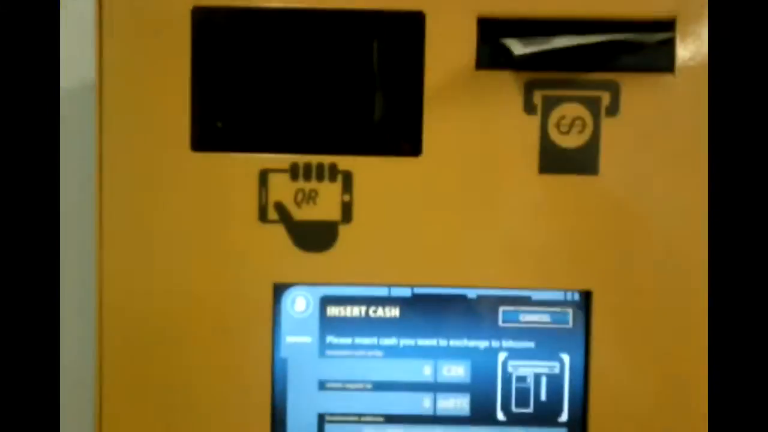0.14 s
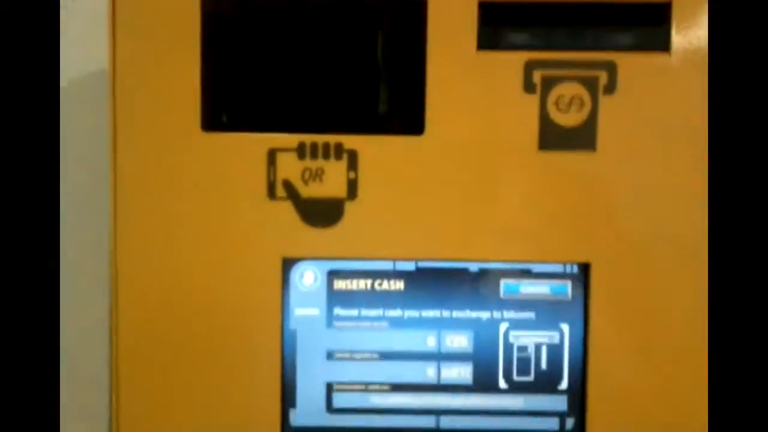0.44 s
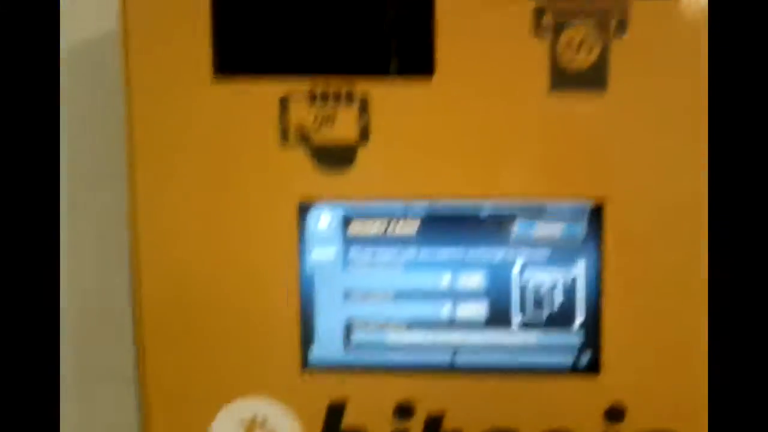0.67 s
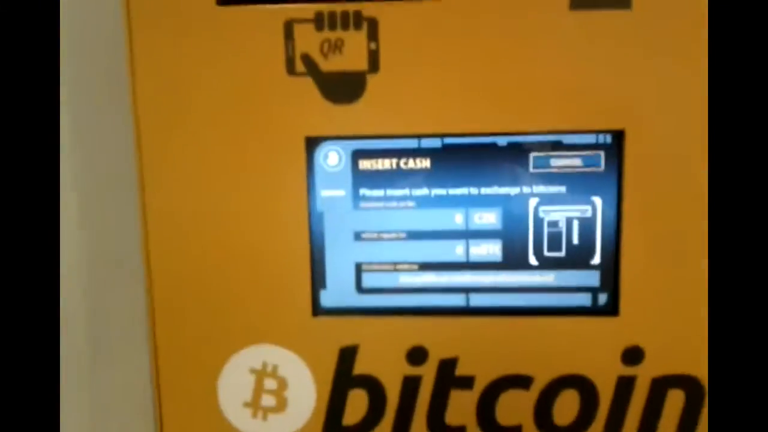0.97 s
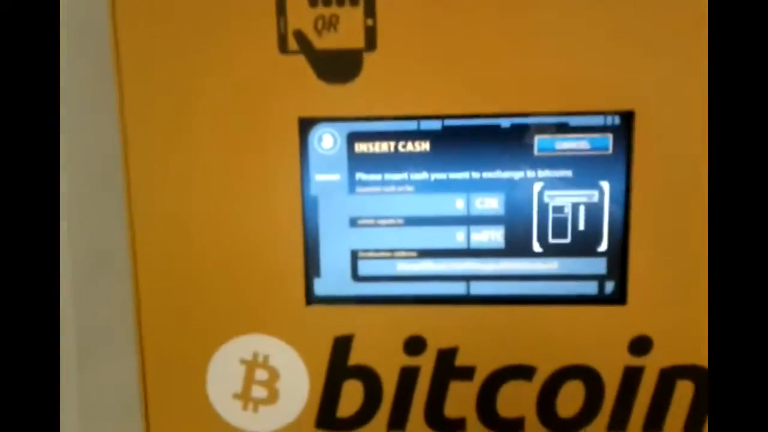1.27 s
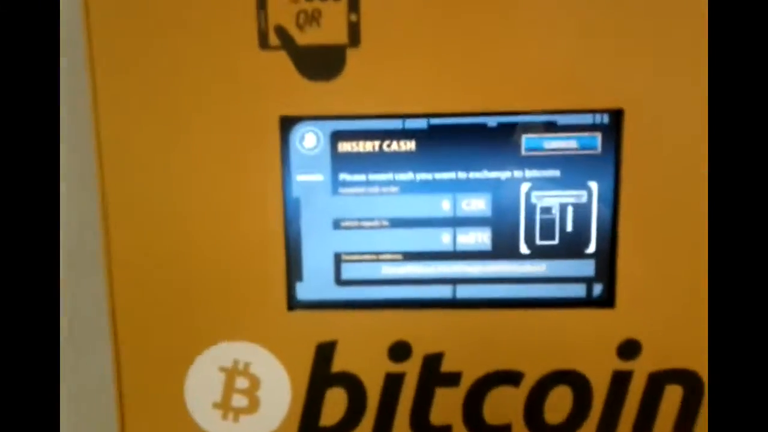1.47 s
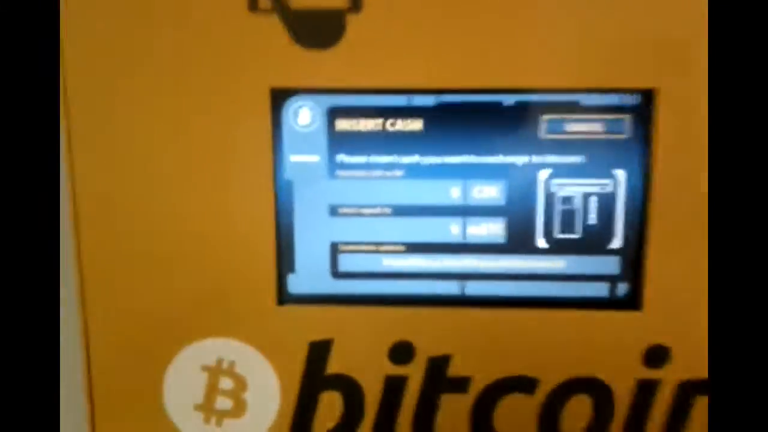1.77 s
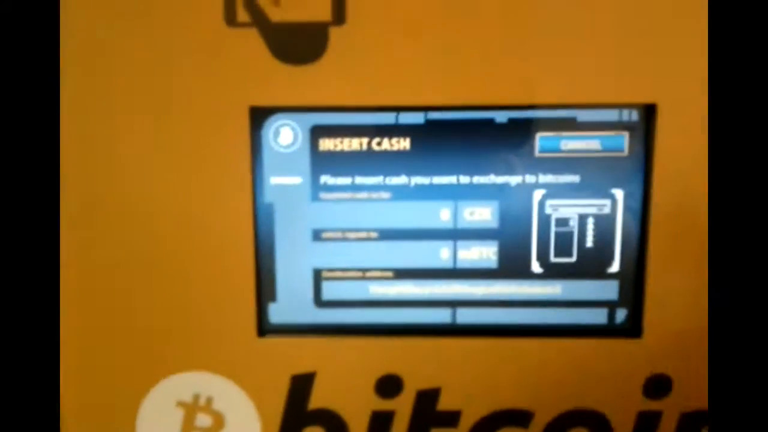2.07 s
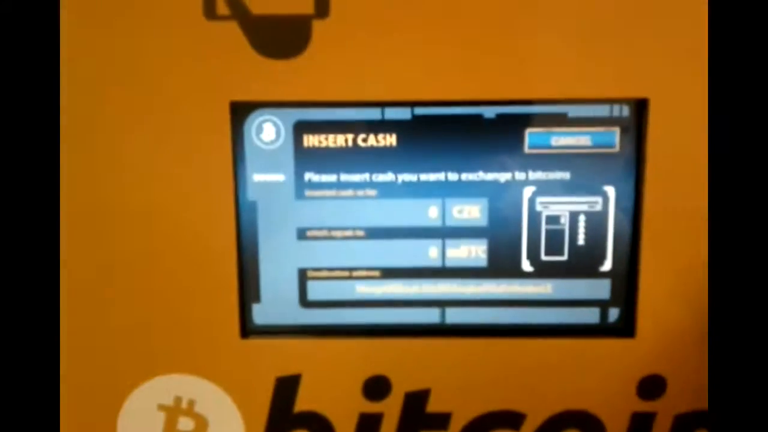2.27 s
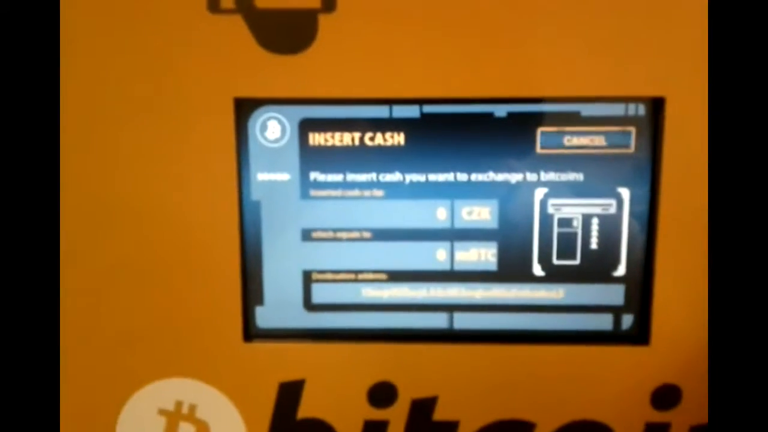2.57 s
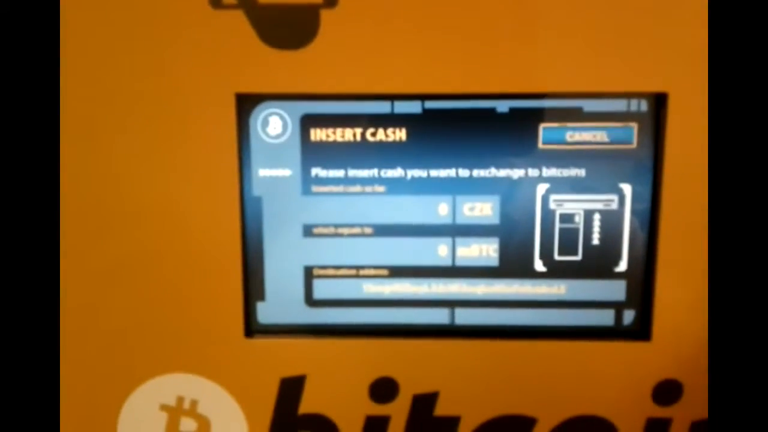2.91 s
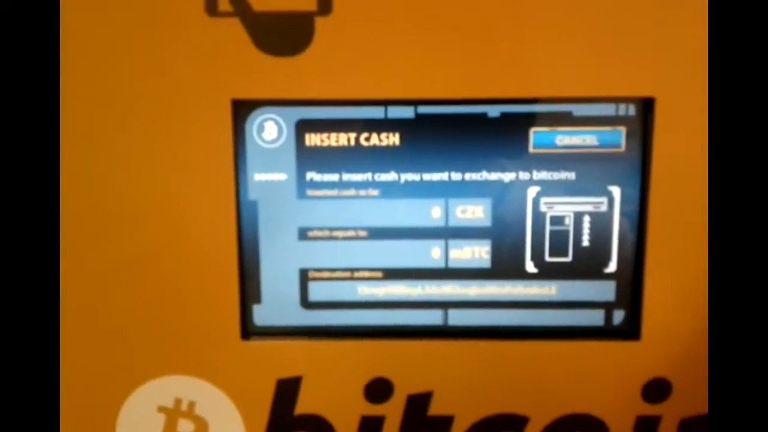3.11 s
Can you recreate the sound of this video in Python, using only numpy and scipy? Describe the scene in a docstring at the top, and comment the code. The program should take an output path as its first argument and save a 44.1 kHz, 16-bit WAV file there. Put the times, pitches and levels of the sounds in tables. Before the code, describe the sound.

Short motor whirs from a cash machine pulling in a banknote, with snaps and paper rustle.

```python
"""A snap and the crackle of a banknote entering its slot open the scene, indoors and close to a phone.
A geared motor then drives the rollers in two short runs: tooth tones at multiples of the shaft rate over noise.
A second small motor hums as a tone with its fifth harmonic; parts click as noise bursts exciting modes.
The note scrapes as grainy coloured noise. Short sine pips, a decaying echo and a quiet room rumble complete it."""
import sys
import numpy as np
from scipy import signal
from scipy.fft import rfft, irfft, next_fast_len
from scipy.io import wavfile
from scipy.ndimage import uniform_filter1d, map_coordinates

SR = 44100
rng = np.random.default_rng(int(sys.argv[2]) if len(sys.argv) > 2 else 0)


def unload_audio(sound):
    """Save the sound as a 16-bit wav file, at the path given as the first command line argument."""
    columns = np.transpose(np.atleast_2d(sound))
    # keep every value between -1 and 1, then stretch to whole-number steps
    steps = np.round(np.clip(columns, -1, 1) * 32767)
    wavfile.write(sys.argv[1], SR, steps.astype(np.int16))


def volts_from_decibels(level):
    """Turn decibel levels (scalar or array-like) into linear amplitude factors."""
    exponent = np.asarray(level, float) / 20
    return 10 ** exponent


N = 143325  # samples


def unit(x):
    """Normalisation: scale a signal to rms 1."""
    return x / np.sqrt(np.mean(x ** 2) + 1e-20)


def along(points, hz):
    """Logarithmic frequency scale: interpolate (f/Hz, value) points on it."""
    f, v = np.transpose(points)
    return np.interp(np.log(hz + 1), np.log(f + 1), v)


def curves(rows, rise_s, fall_db_per_s):
    """Envelope: a gate fading in before the first row and decaying after the last, then each column over time."""
    s, *columns = np.transpose(rows)
    t = np.arange(N) / SR
    fade_in = np.clip((t - s[0]) / rise_s + 1, 0, 1) ** 2
    run_down = volts_from_decibels(-fall_db_per_s * np.clip(t - s[-1], 0, 1))
    return [fade_in * run_down] + [np.interp(t, s, column) for column in columns]


def wobble(rate):
    """Random modulation: straight lines between normal random knots, rate knots a second."""
    knots = rng.standard_normal(int(N * rate / SR) + 4)
    return map_coordinates(knots, [np.arange(N) * rate / SR], order=1)


def filtered(x, response):
    """Linear filtering: multiply the spectrum of x by a function of frequency."""
    m = next_fast_len(x.shape[-1] + 8192)
    spectrum = rfft(x, m) * response(np.fft.rfftfreq(m, 1 / SR))
    return irfft(spectrum, m)[..., :x.shape[-1]]


def resonance(hz, centre_hz, width_hz):
    """Second-order resonance: complex band-pass response, 1 at its centre."""
    damping = 1j * hz * width_hz
    return damping / (centre_hz ** 2 - hz ** 2 + damping)


def rush(spectrum, patchy_db, grains=0):
    """Coloured noise: filtered white noise of rms 1, with time-frequency patches of random gain."""
    z = signal.stft(rng.standard_normal(N) + grains, nperseg=256)[2]
    patches = uniform_filter1d(rng.standard_normal(z.shape), size=4, axis=0)
    patches = unit(uniform_filter1d(patches, size=8, axis=1))
    x = signal.istft(z * volts_from_decibels(patchy_db * patches), nperseg=256)[1][:N]
    return unit(filtered(x, lambda hz: volts_from_decibels(along(spectrum, hz))))


# spectral density of the room rumble: f/Hz, relative level/dB
RUMBLE_SPECTRUM = [(20, -21), (70, -18.5), (130, -5), (300, -2.5), (500, -6.5), (1050, -11.5),
                   (3500, -20.5), (6800, -23)]


def room_rumble():
    """Stationary background noise: coloured noise with a slowly wavering level."""
    level_db = -48.5 + 1.1 * wobble(5.1)
    return volts_from_decibels(level_db) * rush(RUMBLE_SPECTRUM, patchy_db=1.66)


# decay time of the room: f/Hz, t60/s
ROOM_DECAY = [(500, 0.43), (6000, 0.12)]


def room_echo(x):
    """Reverberation: convolution with noise whose decay rate depends on frequency."""
    hz, t, z = signal.stft(rng.standard_normal(SR // 2), SR, nperseg=256)
    t60 = along(ROOM_DECAY, hz)[:, None]
    tail = signal.istft(z * volts_from_decibels(-60 * t / t60), SR, nperseg=256)[1]
    delayed = np.pad(x, (200, 0))  # samples
    return signal.fftconvolve(delayed, tail / np.linalg.norm(tail))[:N]


# a soft low knock, a squeak at each motor start, a dry tick between the runs: t/s, peak level/dB, f/Hz, length/s
PIPS = [(0.361, -36, 399, 0.023), (0.448, -29, 4350, 0.026), (1.8286, -21.5, 2300, 0.0021),
        (2.723, -30.5, 4300, 0.025)]


def pips():
    """Tone bursts: sines under a cosine-squared window centred on their time."""
    t = np.arange(N) / SR
    out = np.zeros(N)
    for s, db, hz, length in PIPS:
        swell = np.cos(np.pi * np.clip((t - s) / length, -.5, .5)) ** 2
        out += volts_from_decibels(db) * swell * np.sin(2 * np.pi * hz * t + 7 * rng.random())
    return out


# second motor, one table a run: t/s, f/Hz, level/dB before a common gain and waver
HUM_RUNS = [
    [(.475, 164.5, -48.5), (.53, 184.9, -43), (1.07, 186, -44.5), (1.145, 189, -55)],
    [(2.745, 158, -46), (2.78, 170, -43.5), (2.825, 181, -45.5), (3.115, 183, -43.5), (3.165, 180.2, -56),
     (3.19, 179.5, -49), (3.25, 177, -53.5)],
]


def second_motor_hum():
    """Frequency modulation: an unsteady low tone with a phase-locked fifth harmonic."""
    out = np.zeros(N)
    for rows in HUM_RUNS:
        gate, hz, db = curves(rows, rise_s=0.0059, fall_db_per_s=900)
        phase = 2 * np.pi * np.cumsum(hz) / SR + 0.26 * wobble(35)
        level = volts_from_decibels(db + 2.0 + 1.9 * wobble(25))
        fifth = volts_from_decibels(-6.5 + 8.3 * wobble(16)) * np.sin(5 * phase)
        out += gate * level * (np.sin(phase) + fifth)
    return out


# snaps and clicks: t/s, peak level of the burst/dB, main pitch f/Hz, low knock relative level/dB, t60/s
SNAPS = [(.003, -10.5, 5000, -24.5, 0.0165), (.0827, -4, 5600, -20, 0.02), (.089, -12, 3330, -16.5, 0.031),
         (0.0943, -16.5, 5760, -17, 0.008), (0.1008, -17.5, 5360, -17, 0.027),
         (1.0385, -7, 5030, -20, 0.018), (1.087, -15.5, 4930, -30, 0.026),
         (1.0964, -13, 4580, -28.5, 0.029), (1.263, -7.5, 5000, -29, 0.021), (1.83, -29, 3700, -15, 0.0077),
         (3.193, -17.5, 2350, -22, 0.021)]
# modes of the mechanism: f/Hz
SNAP_MODES_HZ = [1200, 1750, 2300, 2860, 3330, 4380, 5107, 5500, 5900, 6500]


def snaps():
    """Modal excitation: a noise burst through modes loudest near its pitch, over a low knock of the housing."""
    pitch_width_hz, broad_db, mode_width_hz = 900, -16, 280
    rise_s, knock_hz, knock_width_hz, knock_t60 = .0018, 720, 200, 0.08
    out, t = np.zeros(N + SR), np.arange(SR // 8) / SR
    rise = 1 - np.exp(-t / rise_s)
    for s, db, pitch_hz, knock_db, t60 in SNAPS:
        burst_noise, knock_noise = rng.standard_normal((2, len(t)))
        gains = []
        for mode_hz in SNAP_MODES_HZ:
            nearness = abs(resonance(mode_hz, pitch_hz, pitch_width_hz)) + volts_from_decibels(broad_db)
            gains.append(nearness * volts_from_decibels(2 * rng.standard_normal()))

        def modes(hz):
            """Modal superposition: resonances of alternating sign."""
            return sum((-1) ** k * gain * resonance(hz, mode_hz, mode_width_hz)
                       for k, (mode_hz, gain) in enumerate(zip(SNAP_MODES_HZ, gains)))

        burst = filtered(burst_noise * rise * volts_from_decibels(-60 * t / t60), modes)
        knock = unit(filtered(knock_noise, lambda hz: resonance(hz, knock_hz, knock_width_hz)))
        knock *= volts_from_decibels(knock_db - 60 * t / knock_t60)
        start = max(round((s - rise_s / 2) * SR), 0)
        out[start:][:len(t)] += volts_from_decibels(db) * (burst / np.abs(burst).max() + rise * knock)
    return out[:N]


# the note scraping in the slot, one table a passage: t/s, level/dB, low part relative level/dB
SCRAPES = [
    [(0, -10, -30), (.02, -37, -3), (.077, -33, -18), (.1, -33.5, -5), (.125, -24.5, -24),
     (.204, -26, -8.5), (.226, -39, -2), (.42, -40, 0)],
    [(1.058, -25.5, -19), (1.078, -36, -9), (1.089, -21, -28), (1.14, -27.5, -7.5), (1.215, -26, -14.5),
     (1.232, -15, -16.5), (1.255, -25.5, -14), (1.29, -37.5, -11), (1.4, -56, -18)],
    [(1.58, -64, 8), (1.66, -46, -10), (1.77, -53.5, -1), (1.826, -45.5, -15)],
    [(3.17, -47.5, 15), (3.25, -39, -14)],
]
# spectral density of the paper friction: f/Hz, relative level/dB
PAPER_SPECTRUM = [(700, -36.5), (1200, -6), (1700, -10.5), (2200, -7.5), (3000, -11), (4300, -5.5),
                  (5400, -5.5), (6800, -8.5)]
# spectral density of the sound stirred in the housing: f/Hz, relative level/dB
HOUSING_SPECTRUM = [(90, -44.5), (200, -16), (510, -5.5), (1180, -5), (1800, -6.5), (2600, -19)]


def note_scrape():
    """Friction noise: random impulses within coloured noise, and the lower sound they stir in the housing."""
    grains_per_s, spread_db, grain_db = 900, 3, -7
    hits = rng.random(N) < grains_per_s / SR
    grains = hits * rng.standard_normal(N) * volts_from_decibels(spread_db * rng.exponential(1, N))
    paper = rush(PAPER_SPECTRUM, patchy_db=1.5, grains=volts_from_decibels(grain_db) * unit(grains))
    housing = rush(HOUSING_SPECTRUM, patchy_db=3.5)
    out = np.zeros(N)
    for rows in SCRAPES:
        gate, db, low_db = curves(rows, rise_s=0.0045, fall_db_per_s=800)
        out += gate * volts_from_decibels(db) * (paper + volts_from_decibels(low_db) * housing)
    return out


# geared motor, one table a run: t/s, shaft f/Hz, gear noise level/dB,
# then group level/dB of the first, second, and third and higher tooth harmonics
GEAR_RUNS = [
    [(.428, 84, -33, -43, -36, -48), (.46, 97.95, -27.5, -33, -31.5, -43),
     (.483, 104.4, -30.5, -25.5, -32, -37), (.512, 108.2, -26, -31.5, -32, -33),
     (.66, 109.45, -24.5, -27.5, -30, -31), (.87, 108.55, -24, -30.5, -28.5, -31.5),
     (.98, 109.55, -24, -29, -31.5, -30.5), (1.04, 109.5, -23, -30, -26, -34)],
    [(2.71, 89.5, -28, -52, -38.5, -44), (2.742, 98.6, -26, -46, -34, -30),
     (2.776, 105.7, -27, -41, -30, -30.5), (2.924, 106.6, -24.5, -35, -31, -30),
     (2.955, 107.3, -24.5, -38, -29.5, -31), (3.048, 106.2, -26.5, -32, -31.5, -31),
     (3.11, 109.8, -23, -26.5, -26, -29), (3.158, 110.4, -22.5, -30, -30.5, -36)],
]
# 12-tooth pinion: multiples of the shaft rate around each tooth harmonic; the fractions come from a middle gear
SHAFT_MULTIPLES = [
    [5.48, 7.2, 11, 12, 13],
    [21, 23, 24, 25],
    [33, 35, 36, 37, 40, 47],
]
# relative level/dB of each multiple, by run and tooth harmonic group
MULTIPLE_DB = [
    [[-19, -14, -8.5, 0, -8], [-13, -2.5, -5, -1], [-2, -1, 0.5, 0, 0, 1]],
    [[-14.5, -15.5, -9.5, -3, -10], [-21, -7, -1.5, -2], [-5, -5, -1.5, -2, -7, -6]],
]
# phase step/rad per multiple, by group: near 0 the tone throbs once a turn, near pi / 2 it warbles
SIDE_PHASE_STEP = [.4, 1.5, 1.5]
# how the housing radiates a tone: f/Hz, gain level/dB
HOUSING_GAIN = [(1140, -12), (1200, 0), (2230, 0), (2350, 9), (2480, -2), (3720, -9), (3820, 0), (4030, -1),
                (4085, -10)]
# spectral density of the gear noise: f/Hz, relative level/dB
GEAR_SPECTRUM = [(80, -35), (200, -16.5), (700, -13.5), (1050, -13), (1300, -3), (1520, -15), (1800, -6.5),
                 (2030, -11), (2400, -6), (3150, -12), (3900, -7), (5200, -7), (6800, -11.5)]


def geared_motor():
    """Gear meshing: tooth harmonics with sidebands at multiples of the shaft rate, over gear noise."""
    waver_db, jitter_rad = 1.3, .15
    out = np.zeros(N)
    for rows, run_levels in zip(GEAR_RUNS, MULTIPLE_DB):
        gate, shaft_hz, noise_db, *group_dbs = curves(rows, rise_s=0.02, fall_db_per_s=894)
        turn = 2 * np.pi * np.cumsum(shaft_hz) / SR
        run = volts_from_decibels(noise_db) * rush(GEAR_SPECTRUM, patchy_db=.8)
        groups = zip(SHAFT_MULTIPLES, run_levels, group_dbs, SIDE_PHASE_STEP)
        for harmonic, (multiples, levels, group_db, step) in enumerate(groups, 1):
            start = 7 * rng.random()
            for k, db in zip(multiples, levels):
                side_phase = step * abs(k - 12 * harmonic)
                phase = k * turn + start + side_phase + jitter_rad * wobble(45)
                radiated_db = db + group_db + along(HOUSING_GAIN, k * shaft_hz)
                run += volts_from_decibels(radiated_db + waver_db * wobble(18)) * np.sin(phase)
        out += gate * run
    return out


def scene():
    """Superposition: machine, its echo, the room's rumble and the pips at one microphone."""
    machine = geared_motor() + second_motor_hum() + note_scrape() + snaps()
    echo = volts_from_decibels(-13) * room_echo(machine)
    mono = machine + echo + room_rumble() + pips()
    return np.array([mono, mono])


def band_limit(x):
    """A steep low-pass at the top of the band."""
    return signal.sosfilt(signal.butter(12, 11150, fs=SR, output="sos"), x)


# phone band limit: f/Hz, gain level/dB
BAND_LIMIT = [(6750, 1), (7100, -21), (7600, -39), (7680, -96)]
# mirror band: f/Hz, gain level/dB
MIRROR_BAND = [(8780, -95.5), (8900, -39), (9250, -17.5), (9900, -35), (11000, -60.5)]
# side over mid: f/Hz, level/dB
SIDE_OVER_MID = [(1300, -71), (1900, -20.5), (2500, -12.5), (3400, -19), (7000, -43.5), (8500, -13.5)]


def record(dry):
    """Sampling images: a low-rate phone's band limit and faint mirror band; channels slightly apart near 2 kHz."""
    phone_rate_hz = 16000
    x = filtered(dry[0], lambda hz: hz < phone_rate_hz / 2)
    mirror = 2 * x * np.cos(2 * np.pi * phone_rate_hz * np.arange(N) / SR)
    mid = filtered(x, lambda hz: volts_from_decibels(along(BAND_LIMIT, hz)))
    mid += filtered(mirror, lambda hz: volts_from_decibels(along(MIRROR_BAND, hz)))
    # random phases make the side signal incoherent with the mid
    z = signal.stft(mid, nperseg=512)[2]
    side = signal.istft(z * np.exp(2j * np.pi * rng.random(z.shape)), nperseg=512)[1][:N]
    side = filtered(side, lambda hz: volts_from_decibels(along(SIDE_OVER_MID, hz)))
    return band_limit(np.array([mid + side, mid - side]))


dry = scene()
out = record(dry)
unload_audio(out)
```